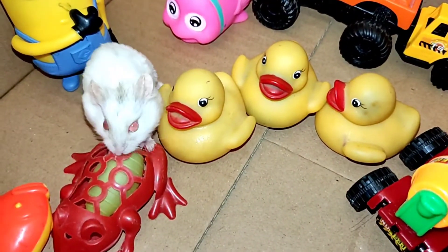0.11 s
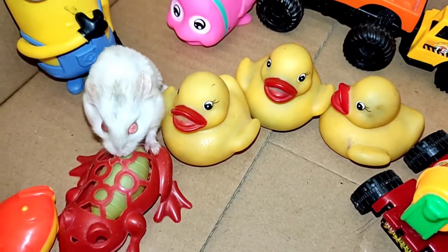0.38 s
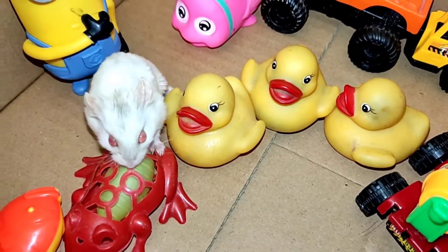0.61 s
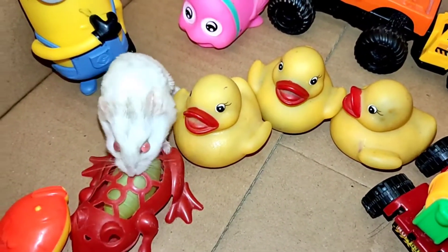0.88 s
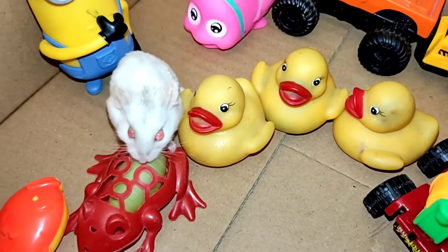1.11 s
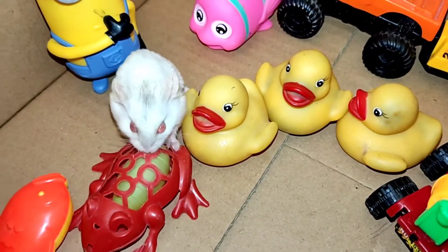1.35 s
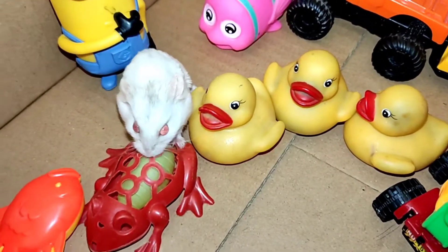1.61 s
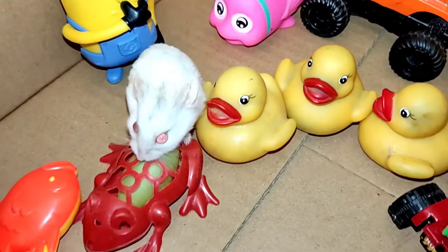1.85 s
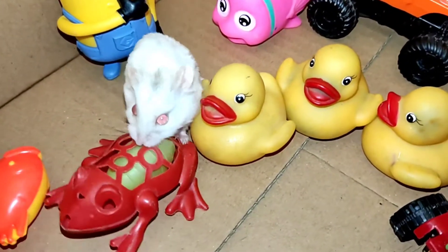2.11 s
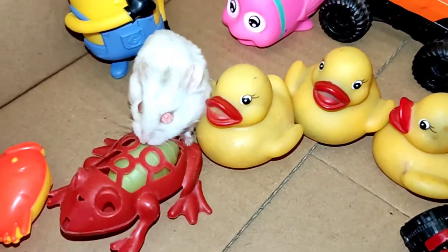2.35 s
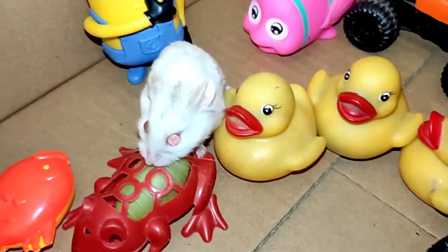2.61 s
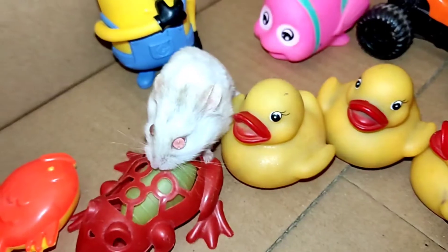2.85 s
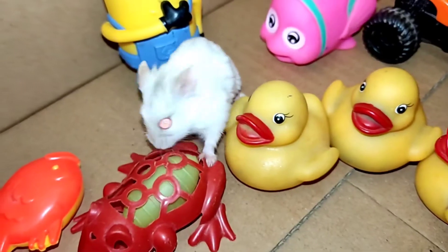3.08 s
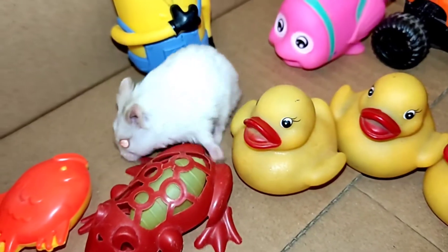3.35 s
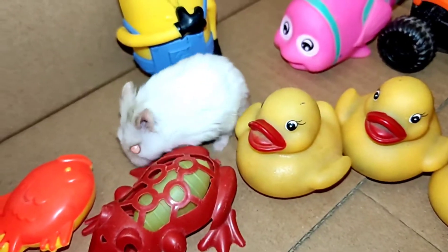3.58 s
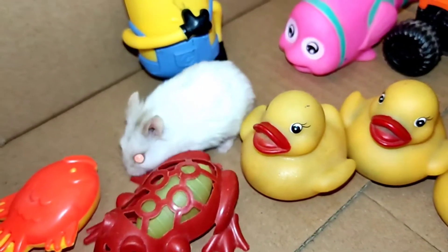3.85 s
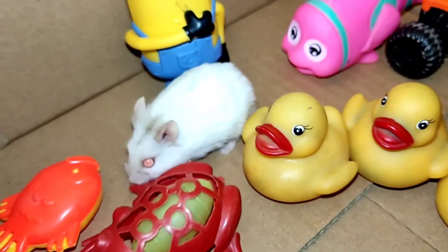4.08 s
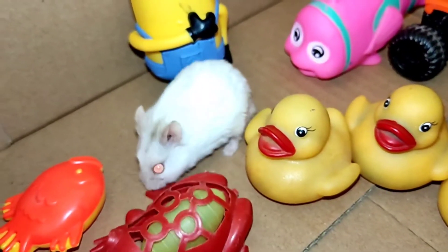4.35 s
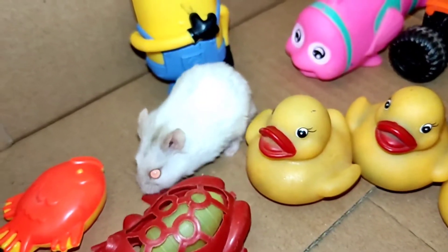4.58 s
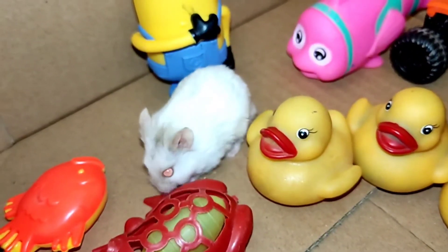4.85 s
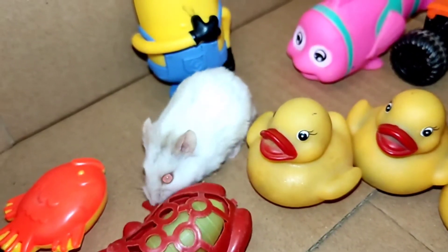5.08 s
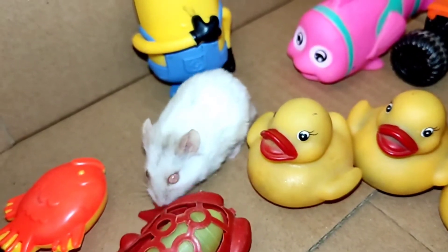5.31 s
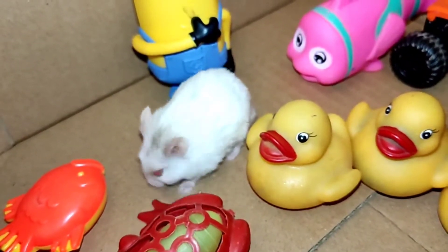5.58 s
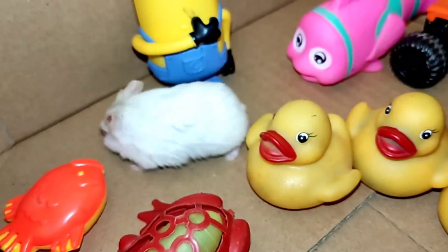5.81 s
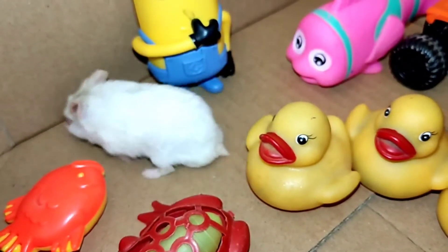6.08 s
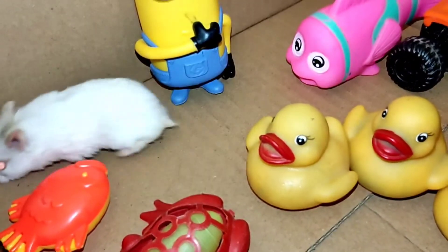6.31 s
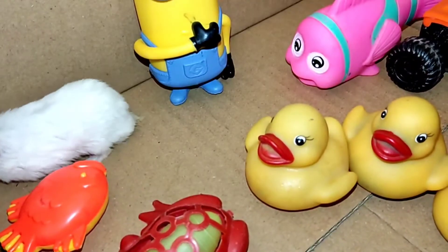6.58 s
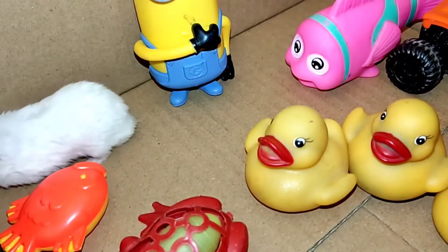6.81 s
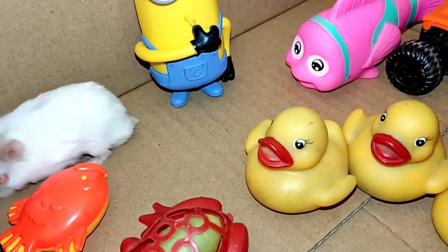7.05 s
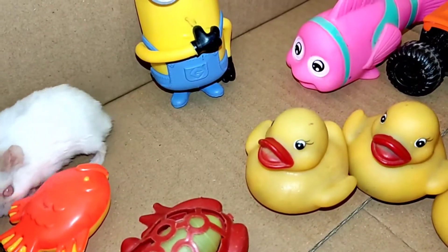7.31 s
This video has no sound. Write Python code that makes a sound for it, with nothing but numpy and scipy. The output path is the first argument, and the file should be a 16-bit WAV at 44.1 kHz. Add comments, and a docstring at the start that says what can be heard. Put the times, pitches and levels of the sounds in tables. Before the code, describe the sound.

A hamster moves among plastic toys on cardboard. At first only delicate clicks and muffled nudges stand out from low wavering room hum and airy hiss. A toy scrapes softly, paws rasp the board, and a hollow toy is knocked. After a calmer patch of ticks and scuffs, quick bright scratches crowd together near the end. Small close stereo microphones, dry box reflections, slight room tail.

```python
"""In a cardboard box in a quiet, humming room, a hamster pads about among plastic toys.
Claws tick as brief contacts and paws scuff as fibre noise; both ring modes of claw and board.
Nudges thud as damped oscillations, a toy slides with friction noise, and a hollow toy is knocked.
The room hums in resonances and wavering tones, under a steady hiss of shaped noise.
Two small microphone ports a hand apart add a bright resonance each."""
import sys
import numpy as np
from scipy import signal
from scipy.io import wavfile

SR = 44100
rng = np.random.default_rng(int(sys.argv[2]) if len(sys.argv) > 2 else 0)


def amplitude_ratio(level_db):
    """Convert a level in decibels to the matching linear amplitude (field) ratio."""
    exponent = np.asarray(level_db, float) / 20
    return 10 ** exponent


def to_wav(sig):
    """Store sig (one row per channel, or 1-D mono) as 16-bit WAV at the path in sys.argv[1].

    Samples outside -1..1 are clipped; the rate is SR.
    """
    pcm = np.clip(np.atleast_2d(sig), -1, 1) * 32767
    pcm = np.round(pcm).astype(np.int16)
    wavfile.write(sys.argv[1], SR, pcm.T)  # frames by channels


N = 327663

# Likeness of the sound at the two ports: f/Hz, left-right correlation
PORT_LIKENESS = [(60, 0.56), (300, 0.86), (640, -0.0091), (1400, -0.25), (3000, -0.047)]
# Modes of a claw, set off by ticks and strokes: f/Hz, width/Hz, relative level/dB
CLAW_MODES = [(4400, 2200, -23), (6010, 180, -7.5), (6840, 930, -8), (8530, 1600, 2), (10460, 2600, -0.5),
              (12820, 3300, -8.5)]
SHIFT_DB, SHIFTS_PER_S = 4, 12   # mode strengths wander at random, so the timbre varies: spread, rate


def rms_one(x):
    """Normalisation of power: scale to rms 1."""
    return x / np.sqrt(np.mean(x ** 2) + 1e-20)


def in_time(rows):
    """Linear interpolation: the columns of a curve at every sample."""
    s, *columns = np.transpose(rows)
    return [np.interp(np.arange(N) / SR, s, c) for c in columns]


def at_hz(points, hz):
    """Interpolation on a logarithmic frequency axis."""
    table_hz, values = np.transpose(points)
    return np.interp(np.log(hz), np.log(table_hz), values)


def drift(rate):
    """Low-passed chance: a slow random course of spread 1."""
    r = np.exp(-80 * np.pi * rate / SR)   # the filter runs on every 40th sample
    slow = signal.lfilter([1], [1, -2 * r, r * r], rng.standard_normal(N // 40 + 2002))[2000:]
    return np.interp(np.arange(N) / 40, np.arange(len(slow)), rms_one(slow))


def correlated(mid, side, alike):
    """Sum and difference of two independent noises: a stereo pair of the given correlation."""
    return np.sqrt(1 + alike) * mid + np.sqrt(1 - alike) * side * [[1], [-1]]


def stereo_noise(alike):
    """White noise at two points of a sound field, with the given correlation."""
    mid, side = rng.standard_normal((2, N))
    return correlated(mid, side, alike) / np.sqrt(2)


def panned(pan_db):
    """Level difference between the channels: left and right gains."""
    return amplitude_ratio(np.array([pan_db / 2, -pan_db / 2]))


def resonance(x, hz, width_hz):
    """Damped oscillator as a two-pole filter, gain 1 on top."""
    r = np.exp(-np.pi * width_hz / SR)
    poles = [1, -2 * r * np.cos(2 * np.pi * hz / SR), r * r]
    return signal.lfilter([(1 - r * r) / 2, 0, (r * r - 1) / 2], poles, x)


def body(x, modes, shift_db=0):
    """Modal superposition with alternating signs; white noise leaves at rms 1, strengths may wander."""
    power = sum(amplitude_ratio(2 * db) * np.pi * width / SR for hz, width, db in modes)
    out = 0
    for k, (hz, width, db) in enumerate(modes):
        drive = x * amplitude_ratio(db + shift_db * drift(SHIFTS_PER_S)) + 1e-18
        out = out + (-1) ** k * resonance(drive, hz, width)
    return out / np.sqrt(power)


def narrow(hz, width_hz):
    """Cascaded resonance: stereo noise passed twice through one mode; rms 1."""
    once = resonance(stereo_noise(at_hz(PORT_LIKENESS, hz)), hz, width_hz)
    return rms_one(resonance(once, hz, width_hz))


def air():
    """Band-limited noise of room air and microphones, its port correlation set band by band."""
    # Spectrum of air and microphone hiss: f/Hz, relative level per Hz/dB
    spectrum = [(36, -1), (70, -6.5), (150, -11.5), (310, -11), (590, -19), (2000, -25), (4400, -28),
                (6500, -27), (8800, -22.5), (11200, -27.5), (14000, -49)]
    level_db = -57   # rms of the whole
    out, white = 0, rng.standard_normal((2, 2, N))
    edges = 22 * 2 ** np.arange(0, 9.6, .4)
    for k, (low, high) in enumerate(zip(edges, edges[1:])):
        band = signal.butter(2, [low, high], "band", fs=SR, output="sos")
        mid, side = signal.sosfilt(band, white[k % 2])   # neighbouring bands stay independent
        hz = np.sqrt(low * high)
        out = out + amplitude_ratio(at_hz(spectrum, hz)) * correlated(mid, side, at_hz(PORT_LIKENESS, hz))
    return amplitude_ratio(level_db) * rms_one(out)


def hum():
    """Modal resonance and frequency modulation: low room modes, distant machinery and a whistle."""
    # Low modes of the room: f/Hz, nominal width/Hz (widened below), rms level/dB
    room_modes = [(35.6, 14, -58.5), (105, 19, -61.5), (169, 30.6, -65.5), (200.4, 5.2, -67.5),
                  (262.2, 17, -67), (302.7, 25, -63), (402, 23, -70.5), (441.8, 7.1, -74)]
    # Wavering motor tones: f/Hz, rms level/dB, spread of the frequency/Hz
    motor_tones = [(34.3, -56.5, 0.46), (442.5, -69.5, 1.374), (311, -68.5, 1.5)]
    out = sum(amplitude_ratio(db) * narrow(hz, 1.26 * width) for hz, width, db in room_modes)
    for hz, db, waver_hz in motor_tones:
        phase = 2 * np.pi * np.cumsum(hz + waver_hz * drift(2.92)) / SR
        out = out + np.sqrt(2) * amplitude_ratio(db + 0.24 * drift(2.2)) * np.sin(phase)
    whistle_db = -70 - 2 * np.arange(N) / SR   # fades by 2 dB per second
    return out + amplitude_ratio(whistle_db) * narrow(8930, 280)


def scatter(t60, db):
    """Diffuse reverberation: an exponentially dying noise response of its own for each port."""
    t = np.arange(SR // 3) / SR
    tail = rng.standard_normal((2, len(t))) * amplitude_ratio(-60 * t / t60) * (t > .0007)
    return tail * amplitude_ratio(db) / np.sqrt(np.sum(tail ** 2, axis=1, keepdims=True))


def box(x):
    """Path difference and reflection: the left port lags, box walls and room return their scatter."""
    # Lag of the left port, less as the animal crosses: t/s, lag/ms
    left_lag = [(3, .35), (4, .18)]
    lag = np.round(in_time(left_lag)[0] * SR / 1000).astype(int)
    direct = np.array([x[0][np.maximum(np.arange(N) - lag, 0)], x[1]])
    response = scatter(0.013, -12) + scatter(0.42, -24)   # box, then room: T60/s, level/dB
    return direct + signal.fftconvolve(direct, response, axes=1)[:, :N]


def thuds():
    """Damped oscillation: a short soft shove sets off a mode of the board and an overtone."""
    # Nudges against the board: t/s, level/dB, f/Hz
    nudges = [(1.299, -34.5, 700), (1.307, -40, 800), (1.381, -36, 694), (1.738, -41, 750),
              (2.407, -35.5, 500), (2.4488, -29, 328), (2.459, -35, 171), (4.583, -31.5, 163),
              (4.601, -37, 177), (4.648, -41.5, 152), (5.129, -40.5, 736)]
    decay_cycles = 14   # swings until the main mode has lost 60 dB
    out, t = np.zeros(N), np.arange(SR // 4) / SR
    for s, db, hz in nudges:
        at, t60 = round(s * SR), decay_cycles / hz
        fall_db = -60 * t / t60
        wobble = np.cumsum(rng.standard_normal(len(t))) * 0.03   # loose contact blurs the phase
        swing = np.sin(2 * np.pi * hz * t + wobble)
        swing = swing + .5 * np.sin(2 * np.pi * 2.1 * hz * t) * amplitude_ratio(fall_db)   # overtone fades faster
        out[at:at + len(t)] += amplitude_ratio(db + fall_db) * swing * (1 - np.exp(-t / 0.00052))
    return out


def grains():
    """Shot noise: dense uneven clicks of catching paper fibres, partly different at each port; rms 1."""
    per_s, alike = 12000, 0.88
    sizes = amplitude_ratio(2.2 * np.minimum(rng.exponential(1, (3, N)), 5)) * rng.choice([-1, 1], (3, N))
    shared, *own = sizes * (rng.random((3, N)) < per_s / SR)
    return rms_one(np.sqrt(alike) * shared + np.sqrt(1 - alike) * np.array(own))


def slide():
    """Sliding friction: hiss follows the pressure on a toy, and narrow modes of toy and board sing."""
    # Pressure on the sliding toy, as hiss: t/s, relative level/dB
    pressure = [(2.335, -58), (2.36, -46.5), (2.44, -44), (2.57, -48.5), (2.63, -57.5), (2.74, -55),
                (2.83, -49.5), (2.94, -52.5), (3.04, -57.5), (3.16, -51), (3.19, -62)]
    # Modes of toy and board: f/Hz, width/Hz, relative level/dB
    tone_modes = [(302, 170, -0.5), (510, 280, 0.5), (856, 35, 4.5), (1114, 64, 4), (2270, 760, -7),
                  (3400, 330, -6)]
    # Bands of the hiss at any pressure: f/Hz, width/Hz, relative level/dB
    hiss_modes = [(4660, 3300, 0), (11100, 2700, 5), (13300, 2500, -20)]
    # Bands of the hiss that needs pressure: f/Hz, width/Hz, relative level/dB
    low_hiss_modes = [(8160, 1370, 2.5), (8910, 1730, 0)]
    start_s, end_s = pressure[0][0], pressure[-1][0]
    hiss_db, = in_time([(start_s - .02, -100)] + list(pressure) + [(end_s + .02, -100)])
    moving_s = np.clip(np.arange(N) / SR - start_s, 0, 1)
    # tones: level at middle pressure, share of its swing, fading in dB per second
    tone_db = -55 + 0.86 * (hiss_db + 51.0) - 9 * moving_s
    friction = (0.53 * grains() + stereo_noise(0.1)) * amplitude_ratio(hiss_db + 1.5 * drift(60))
    press = amplitude_ratio(.5 * (hiss_db + 55.5))
    hiss = amplitude_ratio(-5.0) * body(friction, hiss_modes, SHIFT_DB / 2)
    low_hiss = body(friction * press, low_hiss_modes)
    tones = body(stereo_noise(0.21) * amplitude_ratio(tone_db + 2.0 * drift(44)), tone_modes, SHIFT_DB / 2)
    pan_db = -6.5 + 17 * moving_s   # travels from right to left
    return (hiss + low_hiss + tones) * panned(pan_db)


def contacts(events, excite, board_modes, top_hz=9000, shift_db=SHIFT_DB, tip_modes=CLAW_MODES):
    """Forced vibration: (start s, envelope, board dB) events on an excitation ring tip and board."""
    # Where the paws work: t/s, left-right level/dB
    paw_path = [(0, -9), (2.4, -1), (3.4, 6), (4.4, 0), (4.6, -1.5), (5.6, 2), (6.1, -2), (6.85, 4.5),
                (7.43, -2)]
    low_claw_hz, low_claw_follows = 6670, 0.8   # lower claw modes grow with the contact to the board
    bright, firm, dull = np.zeros((3, 2, N))
    excite = excite * panned(in_time(paw_path)[0])
    for s, envelope, board_db in events:
        at = round(s * SR)
        span = slice(at, at + len(envelope))
        burst = envelope[:N - at] * excite[:, span]
        bright[:, span] += burst
        firm[:, span] += amplitude_ratio(low_claw_follows * (board_db + 19.0)) * burst
        dull[:, span] += amplitude_ratio(board_db) * burst
    upper, lower = (signal.butter(3, low_claw_hz, side, fs=SR, output="sos") for side in ("high", "low"))
    tip_drive = signal.sosfilt(upper, bright) + signal.sosfilt(lower, firm)
    tip = body(tip_drive, tip_modes, shift_db / 3)
    small = signal.butter(6, 4400, "high", fs=SR, output="sos")   # a claw is too small to radiate lower
    top = signal.butter(4, top_hz, fs=SR, output="sos")
    return signal.sosfilt(small, tip) + signal.sosfilt(top, body(dull, board_modes, shift_db))


def scuffs():
    """Stick and release: a stroke swells as the paw catches fibres in uneven clumps, and ends faster."""
    # Paw strokes: t/s of the peak, level/dB, swell time from 1/e/ms, board level re stroke/dB
    strokes = [(1.4293, -50, 24.5, -8), (1.775, -57, 54, -11), (3.757, -56, 23, -20),
               (4.076, -40.5, 26, -16), (4.13, -24.5, 3.4, -43), (4.162, -45, 17.4, -12),
               (4.268, -49, 23, -5), (4.346, -49, 46, -24), (4.437, -41, 31.5, -15),
               (4.6175, -58.5, 49, 8.5), (4.849, -48, 25, -7.5), (4.97, -51, 88, -16),
               (5.073, -46.5, 12, -9.5), (5.131, -42.5, 5.3, -6), (5.4057, -46, 20.5, -12.5),
               (5.512, -46.5, 36, -15), (5.641, -42.5, 18, -13), (6.088, -42.5, 12, -42),
               (6.107, -35.5, 6, -46), (6.247, -47, 14, -40), (6.288, -44, 20, -35),
               (6.35, -28.5, 9.6, -31.5), (6.361, -30, 2.6, -30), (6.43, -49, 93, -31),
               (6.491, -41, 12, -39), (6.533, -26, 6.3, -40), (6.547, -29, 3.1, -35),
               (6.5726, -45, 50, -22.5), (6.574, -39, 5, -39), (6.606, -30.5, 2.1, -32),
               (6.642, -34, 2.9, -28), (6.669, -24, 4.8, -34), (6.676, -25, 4.2, -37),
               (6.685, -24, 3.1, -45), (6.811, -34, 3.5, -40), (6.84, -49.5, 91, -20),
               (6.856, -27, 5.4, -30), (6.955, -24, 4.3, -30), (6.988, -35.5, 8.8, -21),
               (7.01, -31, 23, -17.5), (7.032, -30.5, 9.2, -17.5), (7.0445, -15, 6.2, -37),
               (7.08, -18.5, 5.5, -38), (7.096, -23.5, 49, -20.5), (7.12, -34, 4, -18),
               (7.128, -13.5, 4.3, -23.5), (7.146, -20, 15, -26.5), (7.184, -41, 70, -18),
               (7.2124, -30, 12.5, -24), (7.327, -45.5, 12, -15), (7.38, -53.5, 52, -14)]
    # Open floor under a stroke: f/Hz, width/Hz, relative level/dB
    floor_modes = [(875, 310, 6.5), (1336, 154, 11), (1650, 380, 8), (3300, 1100, 1)]
    # Corner of the box under a stroke: f/Hz, width/Hz, relative level/dB
    corner_modes = [(1080, 2100, -5), (1960, 170, 7), (2300, 55, 3), (2920, 66, 13.5), (3750, 97, 11.5),
                    (5000, 850, 2.5)]
    corner_s = 5.9   # strokes whose span starts from here on are in the corner
    let_go = 0.82   # a stroke ends in this share of the time it took to swell
    ms = np.arange(-SR // 8, SR // 8) * 1000 / SR
    ms = np.where(ms > 0, ms / let_go, ms)
    events = [(s - 1 / 8, amplitude_ratio(db) * np.exp(-(ms / swell_ms) ** 2), board_db)
              for s, db, swell_ms, board_db in strokes]
    fibres = grains() * amplitude_ratio(1.37 * drift(33) + 2.0 * drift(93))
    on_floor = [e for e in events if e[0] < corner_s]
    in_corner = [e for e in events if e[0] >= corner_s]
    return contacts(on_floor, fibres, floor_modes) + contacts(in_corner, fibres, corner_modes)


def snaps(rows, *struck):
    """Impact: each row rises softly over a few ms, clicks twice with a blunt tip and chatters away."""
    tick_ms, rise_ms = 8, 1.53   # times to fall by 21.4 dB after the click, and to rise by it before
    rebound_ms, rebound_db = .6, -2.5   # the tip strikes again at once
    chatter_db, snap_db, blunt = -6, 13.5, 0.47   # contact noise, click, softness of the tip 0-1
    ms = np.arange(-SR // 200, SR // 20) * 1000 / SR
    shape = amplitude_ratio(6.0 - 21.4 * np.where(ms > 0, ms / tick_ms, -ms / rise_ms))
    clicks, at = np.zeros(N + SR), np.array([round(s * SR) for s, db, board_db in rows])
    clicks[at] = 1
    clicks[at + round(rebound_ms * SR / 1000)] = amplitude_ratio(rebound_db)
    soft_clicks = signal.lfilter([1], np.poly([blunt] * 2), clicks[:N])
    excite = amplitude_ratio(chatter_db) * stereo_noise(0.17) + amplitude_ratio(snap_db) * soft_clicks
    events = [(max(s + ms[0] / 1000, 0), amplitude_ratio(db) * shape, board_db) for s, db, board_db in rows]
    return contacts(events, excite, *struck)


def ticks():
    """Impact on a plate and on a shell: claws tick on the board, and a hollow toy is knocked."""
    # Claw and tooth ticks: t/s, relative level/dB, board level re tick/dB
    tick_rows = [(0.0491, -47, -18), (0.19, -49, -24), (0.5992, -39.5, -10), (1.073, -46, -21),
                 (1.285, -40, -22), (1.299, -56.5, 4.5), (1.359, -48, -16), (1.3815, -57.5, 2),
                 (1.6892, -34.5, -16), (1.746, -45, -14), (1.8258, -33.5, -26), (1.8426, -33, -22.5),
                 (2.1524, -45, -8.5), (2.236, -50, 2), (2.2859, -33.5, -24.5), (2.3756, -25, -44),
                 (2.677, -50, -5), (2.956, -47, -12), (2.965, -39, -28), (2.9725, -37.5, -11),
                 (3.393, -48.5, 2.5), (3.6746, -41, -28), (4.058, -40.5, -20.5), (4.245, -47, -19),
                 (4.1598, -40.5, -12), (4.3605, -51.5, -14), (4.3775, -44.5, -14), (4.442, -42, -24),
                 (4.669, -36.5, -32), (4.735, -43, -15), (4.821, -39.5, -15), (5.0491, -48.5, -9),
                 (5.1222, -35, -19), (5.1285, -42, -16), (5.373, -51, -10.5), (5.49, -57, -9),
                 (5.506, -31.5, -25.5), (5.6175, -48, -9.5), (6.2015, -46, -33), (6.536, -23.5, -43),
                 (6.6245, -38.5, -35), (6.674, -29, -44), (6.795, -53, -35), (6.833, -39, -43),
                 (6.958, -23.5, -48), (7.3365, -47, -31), (7.3637, -41, -31), (7.378, -37.5, -35)]
    # Board under a tick: f/Hz, width/Hz, relative level/dB
    board_modes = [(750, 440, 4), (1390, 1300, 7.5), (2020, 2900, 0), (3870, 5900, 1.5)]
    # A hollow toy is knocked and bounces: t/s, relative level/dB, hollow tone re snap/dB
    knock_rows = [(4.566, -61, 4.5), (4.5829, -16, -13.5), (4.5885, -45, -3), (4.5955, -54, 4),
                  (4.6215, -41.5, -4.5)]
    # Hollow tone of the toy: f/Hz, width/Hz, relative level/dB
    toy_modes = [(690, 210, -4.5), (1000, 120, -1.5), (1490, 770, -0.5), (1830, 660, 0.5)]
    # Thin wall of the toy: f/Hz, width/Hz, relative level/dB
    shell_modes = [(5900, 330, -3.5), (7400, 400, -1), (8560, 650, 4), (11200, 3040, -4.5)]
    fidgets_per_s = 4.6   # faint ticks at random
    when, size = rng.random((int(fidgets_per_s * N / SR), 2)).T
    fidget_db = -59 - 3 * np.log(size + .1)
    fidgets = [(s, db, -18) for s, db in zip(when * N / SR, fidget_db)]
    toy_top_hz = 2140   # the hollow tone stops above this
    knocks = snaps(knock_rows, toy_modes, toy_top_hz, 0, shell_modes)
    return snaps(tick_rows + fidgets, board_modes) + knocks


def scene():
    """Superposition: animal and toys in the box, over the room."""
    return box(ticks() + scuffs() + slide() + thuds()) + hum() + air()


def port(x, peaks):
    """Cavity resonance: a chain of boosts and cuts."""
    for hz, width, db in peaks:
        x = x + (amplitude_ratio(db) - 1) * resonance(x, hz, width)
    return x


def top_cut(x):
    """Nothing passes above the cut-off."""
    return signal.sosfilt(signal.butter(12, 15650, fs=SR, output="sos"), x)


def record(dry):
    """Port resonance and band limit: each port rings, the left treble is lowered, the top steps down."""
    # Resonances of the left port: f/Hz, width/Hz, gain/dB
    left_peaks = [(11130, 1170, 6.5), (14140, 620, 7), (8400, 2200, -5.5)]
    # Resonances of the right port: f/Hz, width/Hz, gain/dB
    right_peaks = [(8950, 930, 9), (10580, 4300, -9.5)]
    left_treble_db = -4.5   # shelf above about 11 kHz
    treble = signal.sosfilt(signal.butter(2, 11000, "high", fs=SR, output="sos"), dry[0])
    left = port(dry[0] + (amplitude_ratio(left_treble_db) - 1) * treble, left_peaks)
    right = port(dry[1], right_peaks)
    step = signal.ellip(5, 1, 24, 14250, fs=SR, output="sos")   # 24 dB down above 14250 Hz
    return top_cut(signal.sosfilt(step, np.array([left, right])))


dry = scene()
out = record(dry)
to_wav(out)
```